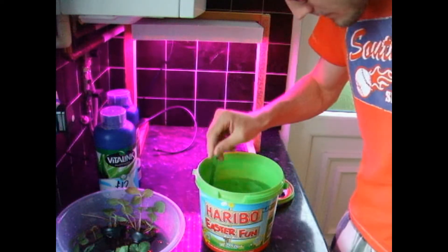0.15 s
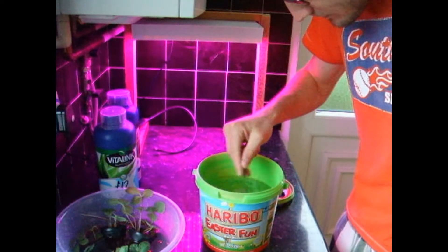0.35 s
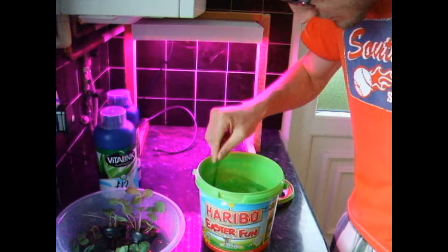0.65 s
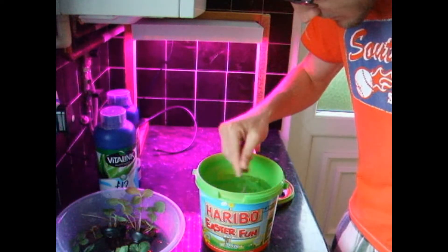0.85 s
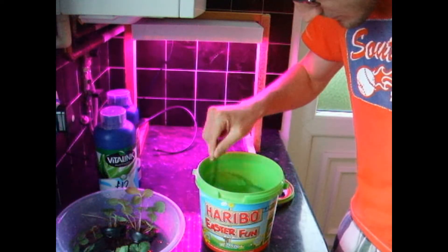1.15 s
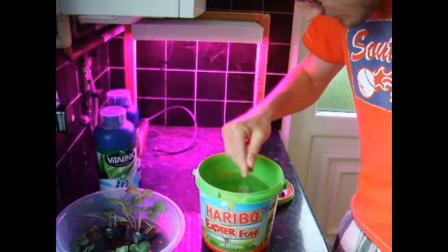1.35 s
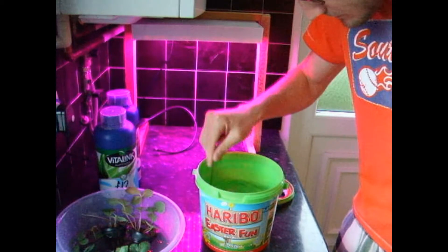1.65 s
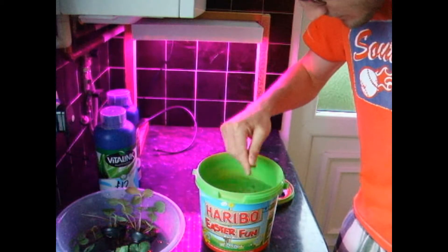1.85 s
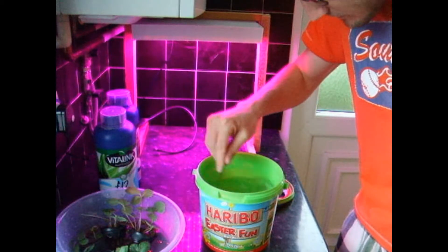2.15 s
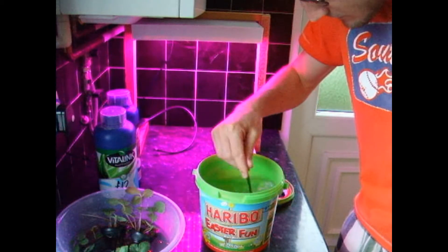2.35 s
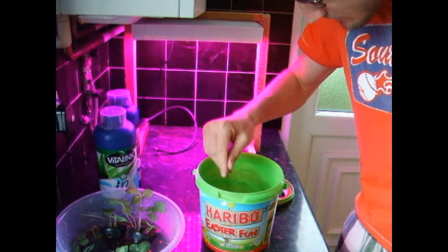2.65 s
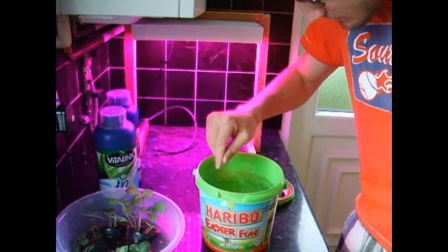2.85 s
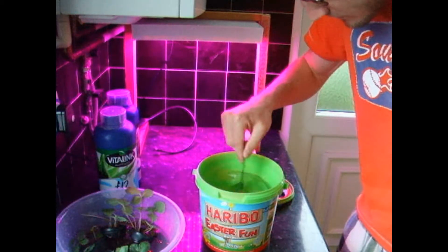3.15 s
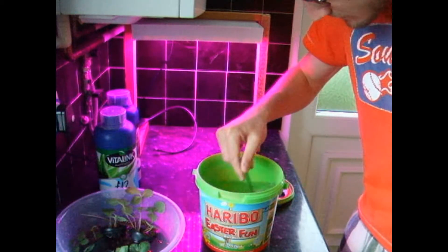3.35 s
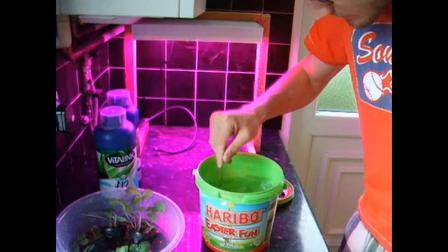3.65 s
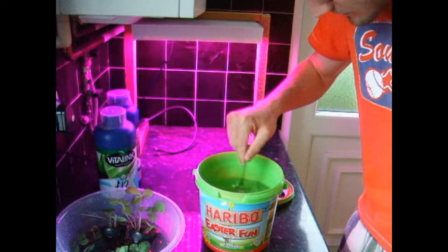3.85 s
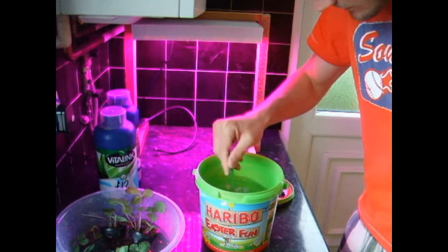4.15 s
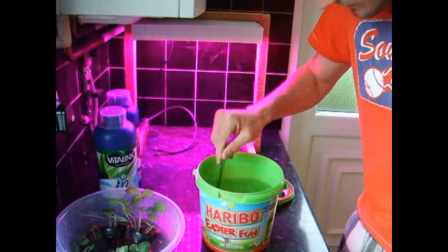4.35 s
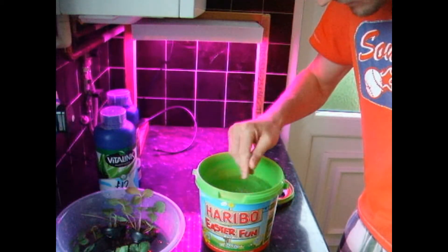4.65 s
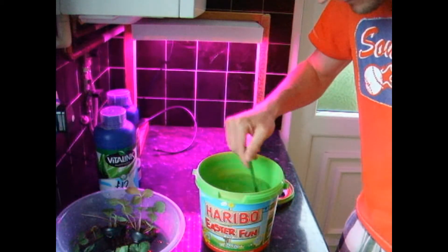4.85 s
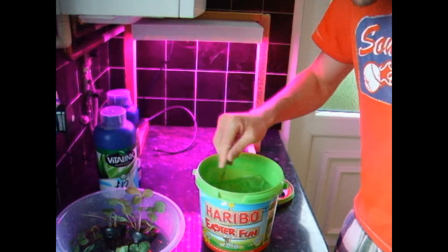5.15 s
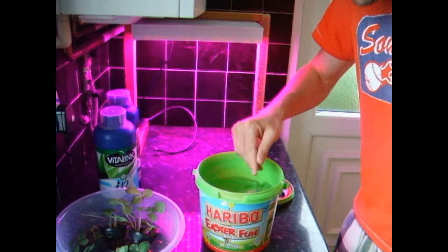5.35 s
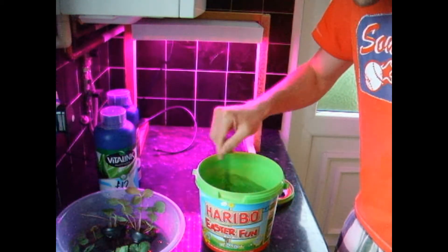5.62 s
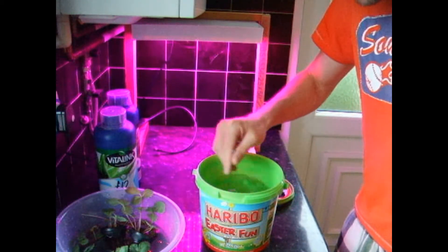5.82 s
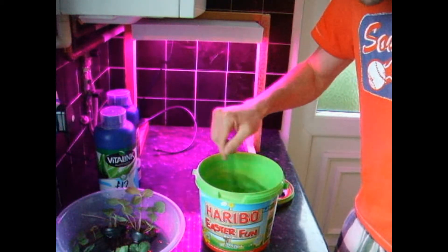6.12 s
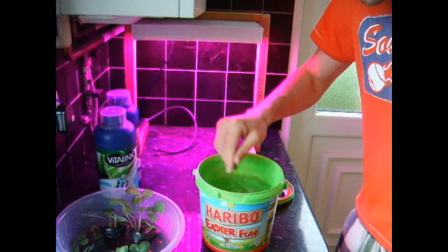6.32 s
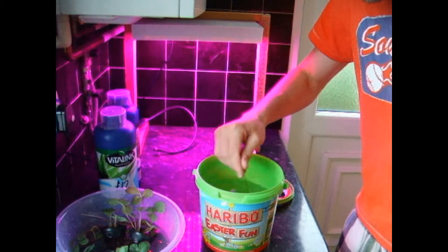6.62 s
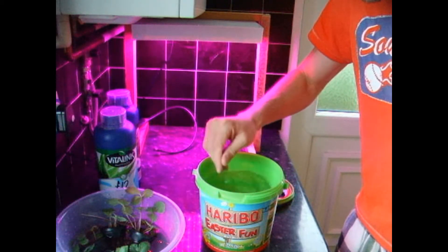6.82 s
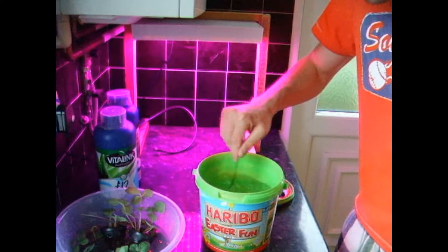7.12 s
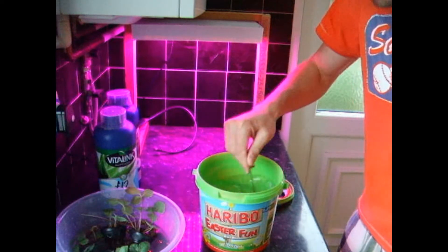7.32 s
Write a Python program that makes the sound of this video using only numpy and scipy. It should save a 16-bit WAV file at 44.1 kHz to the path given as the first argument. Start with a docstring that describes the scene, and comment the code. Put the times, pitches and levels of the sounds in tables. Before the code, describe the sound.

Irregular clicks and hollow knocks on a plastic bucket as water is stirred, with faint swishes and bubbles in a quiet kitchen.

```python
"""Ticks and hollow knocks over lapping water: a thin stick stirs a plastic bucket in a tiled kitchen.
Each contact ticks, rings the water-laden wall and rocks the water to a soft low note.
The wake traps bubbles that plink, swish and fizz; the surface tears in small splashes.
The room rings briefly, over steady room noise, mains hum and a small camera's hiss and whine.
From halfway, a faint low drone climbs twice."""
import sys
import numpy as np
from scipy import signal
from scipy.fft import rfft, irfft, next_fast_len
from scipy.io import wavfile
from scipy.ndimage import map_coordinates

SR = 44100
rng = np.random.default_rng(int(sys.argv[2]) if len(sys.argv) > 2 else 0)


def generate_wav(signal):
    """Clip the signal to [-1, 1] and save it as 16-bit WAV at the path in sys.argv[1]."""
    frames = np.transpose(np.atleast_2d(signal))
    scaled = np.clip(frames, -1, 1) * 32767
    pcm = np.round(scaled).astype(np.int16)
    wavfile.write(sys.argv[1], SR, pcm)


N = 329868
TIME_S = np.arange(N) / SR
AGE_S = np.arange(SR // 2) / SR  # since an event's onset


def amp(db):
    """Decibels to gain."""
    return 10 ** (np.asarray(db) / 20)


def unit_rms(x):
    """Scale to rms 1."""
    return x / np.sqrt(np.mean(x ** 2) + 1e-20)


def along(points, hz):
    """Interpolate (freq_hz, value) points on a log frequency axis."""
    freq_hz, values = np.transpose(points)
    return np.interp(np.log(hz + 1), np.log(freq_hz + 1), values)


def filtered(x, response):
    """Apply the gain response(hz)."""
    size = next_fast_len(len(x) + 8192)
    return irfft(rfft(x, size) * response(np.fft.rfftfreq(size, 1 / SR)), size)[:len(x)]


def noise(spectrum, size):
    """Coloured noise, rms 1."""
    return unit_rms(filtered(rng.standard_normal(size), lambda hz: amp(along(spectrum, hz))))


def wobble(rate_hz):
    """Smooth random curve with knots at rate_hz."""
    return map_coordinates(rng.standard_normal(N // 100), [TIME_S * rate_hz], mode="wrap")


def fade(t60_s, age_s=AGE_S):
    """Decay of 60 dB in t60_s."""
    return np.exp(-np.log(1000) * age_s / np.maximum(t60_s, 1e-3))


def swell(rise_s):
    """Soft onset."""
    return 1 - np.exp(-(AGE_S / max(rise_s, 1e-4)) ** 2)


def arch(middle_s, length_s):
    """Half-cosine rise and fall, zero outside."""
    return np.cos(np.pi * np.clip((TIME_S - middle_s) / length_s, -.5, .5))


def burst(spectrum, envelope):
    """Enveloped noise, scaled to the envelope's energy."""
    x = noise(spectrum, len(AGE_S)) * envelope
    return x * np.linalg.norm(envelope) / np.linalg.norm(x)


def add(track, start_s, sound):
    """Mix a sound into the track."""
    part = track[max(round(start_s * SR), 0):][:len(sound)]
    part += sound[:len(part)]


# room noise: freq_hz, density_db
ROOM_SPECTRUM = [(20, -10), (45, -6.5), (100, -3), (135, -4.5), (170, -7), (300, -6.5), (750, -5),
                 (1450, -10.5), (2100, -16.5), (2800, -12), (4100, -17), (5100, -15.5), (6400, -16.5),
                 (8000, -25)]
# mains hum and one faint high tone: pitch_hz, rms_db
HUM_TONES = [(49, -67), (98, -79), (147, -66.5), (2821, -97.5)]
# camera whine: pitch_hz, level_db
WHINE_TONES = [(7678, -78), (7707, -78), (8312, -84)]
# camera hiss: freq_hz, density_db
HISS_SPECTRUM = [(5500, -40), (6800, -8), (7600, 0), (8600, 0)]


def background(room_db=-54.0, hiss_db=-71, fuzz_db=-3):
    """Steady room noise and firm mains hum; the camera adds hiss and a fuzzy whine."""
    def tone(hz, drift_rad):
        return np.sqrt(2) * np.sin(2 * np.pi * hz * TIME_S + drift_rad)

    hum = sum(amp(db) * tone(hz, 0.43 * wobble(4.9)) for hz, db in HUM_TONES)
    whine = np.zeros(N)
    for hz, db in WHINE_TONES:
        core = tone(hz, .6 * wobble(25.0))
        fuzz = amp(fuzz_db) * wobble(110) * tone(hz, 2 * wobble(60))
        whine += amp(db) * (core + fuzz)
    hiss = amp(hiss_db) * noise(HISS_SPECTRUM, N)
    return amp(room_db) * noise(ROOM_SPECTRUM, N) + hum + whine + hiss


# room decay: freq_hz, t60_s
ROOM_DECAY = [(130, 0.27), (400, 0.31), (1000, 0.22), (2800, 0.35), (8000, 0.11)]
# nearest tiles and cupboards: nominal_delay_s, level_db
WALL_ECHOES = [(.0045, -13), (.0085, -12), (0.0125, -11)]


def kitchen(x, wet_db, build_s):
    """Near walls echo, then the room rings; delays and tail are drawn anew for each sound."""
    hz, frame_s, frames = signal.stft(rng.standard_normal(len(AGE_S)), SR, nperseg=256)
    decay = fade(along(ROOM_DECAY, hz)[:, None], frame_s)
    tail = signal.istft(frames * decay, SR, nperseg=256)[1][:len(AGE_S)]
    reverb = signal.fftconvolve(x, tail * swell(build_s))[:len(x)]
    near = x.copy()
    for delay_s, db in WALL_ECHOES:
        add(near, delay_s * rng.uniform(0.78, 1.15), amp(db) * x)
    return (unit_rms(near) + amp(wet_db) * unit_rms(reverb)) * np.sqrt(np.mean(x ** 2))


def bubble_swarm(spectrum, low_hz, high_hz, t60_cycles, spread_db, count):
    """Tiny bubbles of random onset, pitch and size chirp upward in the room; rms 1."""
    track, age_s = np.zeros(N), AGE_S[:SR // 20]
    for when, place, size in rng.random((count, 3)):
        hz = low_hz * (high_hz / low_hz) ** place
        chirp = np.sin(2 * np.pi * hz * age_s * (1 + 2 * age_s))
        add(track, when * N / SR, amp(spread_db * size ** 2) * chirp * fade(t60_cycles / hz, age_s))
    coloured = filtered(track, lambda hz: amp(along(spectrum, hz)))
    return unit_rms(kitchen(coloured, wet_db=1, build_s=0.024))


# quick strokes of the stick: fastest_s, length_s, swish_db, slosh_db
STICK_STROKES = [(0.424, 0.093, -43.5, -42.5), (0.615, 0.053, -43.5, -51.5), (1.122, 0.052, -47, -57),
                 (1.396, 0.16, -47.5, -46.5), (1.656, .06, -48, -42), (2.104, .06, -53, -42.5),
                 (2.624, 0.13, -49, -57), (3.102, 0.16, -52, -46.5), (3.268, 0.11, -42.5, -42.5),
                 (3.768, .06, -59, -48), (4.318, 0.051, -51, -40), (4.79, 0.076, -43.5, -50),
                 (5.4, .04, -45, -48), (6.237, 0.1, -59, -43), (6.76, 0.084, -48.5, -66),
                 (7.29, 0.31, -49, -47)]
# lapping water: freq_hz, gain_db
SLOSH_SPECTRUM = [(120, -31.5), (300, -11), (550, -3.5), (800, 5), (1450, 6.5), (2000, 0.5), (4000, -48)]
# fizz and spray: freq_hz, gain_db
SPRAY_SPECTRUM = [(900, -48.5), (2000, -7.5), (2800, -2), (3300, 1), (3900, -7), (5100, 1), (6300, -15.5),
                  (9000, -64.5)]


def wake(wave_s=0.2, slosh_gain_db=-4.5, fizz_gain_db=-7, fizz_share=.15):
    """Stirred water laps low and fizzes high; each stroke raises a wave that adds to both."""
    calm_slosh, calm_fizz = amp(-52), amp(-55.5)
    waves = sum(amp(db) * arch(fastest_s, wave_s) for fastest_s, _, _, db in STICK_STROKES)
    slosh = bubble_swarm(SLOSH_SPECTRUM, 286.0, 1870, t60_cycles=25.0, spread_db=15.5, count=2000)
    fizz = bubble_swarm(SPRAY_SPECTRUM, 1500, 6500, t60_cycles=7.5, spread_db=14.5, count=2600)
    return (amp(slosh_gain_db) * np.hypot(calm_slosh, waves) * slosh
            + amp(fizz_gain_db) * np.hypot(calm_fizz, fizz_share * waves) * fizz)


# stick meets bucket: start_s, level_db, thump_relative_db, tick_relative_db
CONTACTS = [(0.049, -38, -29, 2), (0.087, -32, -22, -7.5), (0.48, -26.5, -6, -5.5),
            (0.684, -23.5, -8.5, -4), (0.76, -37.5, 9, -19), (0.968, -23.5, -8, -7.5),
            (1.005, -28.5, -5, -13), (1.168, -23, -28, -1.5), (1.197, -27, -8.5, -8), (1.462, -27, -12, -1),
            (1.523, -34.5, 0.5, -8), (1.659, -24.5, -7.5, -5.5), (1.701, -28, -4, -22),
            (1.919, -17.5, -2, -8.5), (1.929, -10, -15, -23), (1.938, -14, -10, -28),
            (2.147, -27.5, -10, -14), (2.198, -37.5, 0, -26), (2.453, -36.5, -1, -8),
            (2.941, -28.5, -2, -37), (3.415, -18, -6.5, -20), (3.828, -26, -12, -4.5),
            (3.898, -29.5, -15, -6), (3.966, -31.5, -26, -2.5), (4.385, -19.5, -16, -5.5),
            (4.838, -18, -8.5, -7), (4.847, -16.5, -12, -30), (5.156, -23, -19, -6), (5.316, -36, 5, -4),
            (5.435, -19, -8, -5.5), (5.719, -16.5, -13.5, -12.5), (6.039, -21.5, -7, -1.5),
            (6.254, -25.5, -16.5, -6.5), (6.342, -31.5, -12, -9), (6.491, -29, -8, -18),
            (7.378, -26, -2.5, 1)]
# modes of the filled bucket: pitch_hz, level_db, t60_s
BUCKET_MODES = [(294.7, 1, 0.11), (338, -4, 0.11), (468.5, -6.5, 0.37), (512.1, 1.5, 0.17),
                (561, -2.5, 0.11), (688.5, 5, 0.092), (685, 2.5, 0.22), (765.2, 13, 0.077),
                (848, -10, 0.075), (929.5, -1.5, 0.17), (1020, -10, 0.15), (1102, -2, 0.28),
                (1348, -6, 0.19), (1390, -48.5, 0.12), (1633, -5.5, 0.078)]
# wall thud: freq_hz, density_db
THUD_SPECTRUM = [(100, -32.5), (215, -55.5), (285, -4), (390, -5), (510, -4.5), (780, 6), (1000, -4.5),
                 (1200, -4), (1500, -7.5), (1950, -28), (2600, -29), (3300, -34.5), (4000, -44.5),
                 (9000, -80.5)]
# stick tick: freq_hz, density_db
TICK_SPECTRUM = [(300, -22.5), (1000, -21.5), (1500, 10), (2000, -9), (2600, 4), (3300, -5), (3900, -13.5),
                 (5200, -9), (6300, -30), (9000, -53.5)]


def thump_tilt_db(hz, thump_db, offset_db=8, bass_hz=560, treble_hz=1200):
    """A blunt, deep contact moves more of the wall: more bass, less treble."""
    bass_shelf = 1 / (1 + (hz / bass_hz) ** 6)
    treble_shelf = 1 / (1 + (treble_hz / hz) ** 6)
    return (thump_db + offset_db) * (bass_shelf - 0.27 * treble_shelf)


def knocks(ring_db=-21, thud_db=-3.0, rebound_db=1.0, rebound_s=.008, tick_gain_db=-2, scatter_db=3):
    """The stick ticks at once; the water-laden wall swings in, springs back and rings."""
    track = np.zeros(N)
    mode_hz, mode_db, t60_s = np.transpose(BUCKET_MODES)[:, :, None]
    for start_s, level_db, thump_db, tick_db in CONTACTS:
        rise_s = 0.0029 * 2 ** ((level_db + 28.5) / 28)  # a harder push bends the wall for longer
        strength = amp(mode_db + thump_tilt_db(mode_hz, thump_db) + 2 * rng.standard_normal(t60_s.shape))
        modes = np.sin(2 * np.pi * (mode_hz * AGE_S + rng.random(mode_hz.shape)))
        ring = amp(ring_db) * np.sum(strength * fade(t60_s) * modes, axis=0) * swell(rise_s)
        wall_spectrum = [(hz, db + thump_tilt_db(hz, thump_db)) for hz, db in THUD_SPECTRUM]
        thud = burst(wall_spectrum, amp(thud_db) * fade(0.044) * swell(rise_s))
        rebound = burst(wall_spectrum, amp(rebound_db) * fade(0.021) * swell(0.0011))
        body = ring + thud
        add(body, rebound_s, rebound)
        # the tick's colour varies from place to place on the wall
        colour = [(hz, db + scatter_db * rng.standard_normal()) for hz, db in TICK_SPECTRUM]
        tick = burst(colour, amp(tick_db + tick_gain_db) * fade(0.031) * swell(0.00028))
        knock = kitchen(body, wet_db=-4.5, build_s=0.014) + kitchen(tick, wet_db=-4.5, build_s=0.0079)
        add(track, start_s, amp(level_db) * knock)
    return track


def heaves(pitch_hz=130.7, t60_s=0.57, gain_db=-35.5, db_per_thump_db=0.54):
    """Each thump rocks the water mass against the soft wall, giving a low note."""
    track = np.zeros(N)
    for start_s, level_db, thump_db, _ in CONTACTS:
        note = np.sin(2 * np.pi * (pitch_hz * AGE_S + rng.random())) * fade(t60_s) * swell(2 / pitch_hz)
        add(track, start_s, amp(gain_db + db_per_thump_db * (level_db + thump_db)) * note)
    return track


# larger bubbles: start_s, pitch_hz, level_db, glide_octaves_per_s
LARGE_BUBBLES = [(0.278, 2616, -26.5, 3), (0.279, 2887, -29.5, 2), (0.584, 1315, -28, 1),
                 (0.586, 2080, -37.5, 4), (0.605, 1536, -27.5, 2), (0.648, 1463, -10.5, 0.5),
                 (1.109, 2670, -40, 3.5), (1.111, 1700, -36.5, 7), (1.168, 1517, -22, 10),
                 (1.169, 1092, -19.5, -5.5), (1.315, 1097, -27.5, 4), (1.347, 1275, -34.5, 12),
                 (1.70, 356, -34.5, -3), (1.907, 2810, -37, 5), (2.055, 1124, -35, -0.5),
                 (2.225, 473, -43, -1.5), (2.551, 2265, -39, 12), (2.735, 3300, -45, -0.5),
                 (2.84, 290, -46, 0), (2.55, 1590, -42.5, 4.5), (2.582, 1760, -41, 0),
                 (3.165, 822, -33.5, 3), (3.196, 1134, -30.5, 28), (3.207, 1465, -28, 5),
                 (3.679, 2380, -29, 7), (3.679, 2593, -27.5, 1), (3.681, 1690, -35.5, 5.5),
                 (4.199, 1023, -36, 2.5), (4.2, 1275, -36.5, -1), (4.258, 1304, -34, 3),
                 (4.71, 1450, -39, -6), (4.727, 1420, -33, 2.5), (4.762, 1520, -36, 2),
                 (5.064, 1290, -31, 16.5), (5.145, 840, -31, 14.5), (5.155, 1043, -26, 28.5),
                 (5.385, 1550, -31.5, -0.5), (5.396, 2650, -40.5, -1), (5.975, 2650, -40, 3),
                 (6.176, 1126, -41.5, 16.5), (6.490, 670, -28.5, -1), (6.693, 2690, -40, 13),
                 (6.608, 1277, -39.5, 9), (6.733, 1297, -32.5, 3), (6.754, 1450, -31, 2),
                 (6.78, 1428, -34.5, 14.5), (6.779, 2470, -41, 1.5), (7.218, 1870, -35, -3),
                 (7.199, 1350, -34.5, 1), (7.218, 1442, -31.5, -0.5), (7.23, 1403, -27.5, 3),
                 (7.246, 3300, -33.5, 1.5), (7.268, 1431, -19.5, 10), (7.272, 1840, -31, 4.5),
                 (7.273, 2840, -36, -0.5), (7.312, 3000, -38.5, 6)]


def bubbles(gain_db=3, spit_db=-26, quiver_octaves=0.023, glide_s=.04, t60_at_1khz_s=0.078):
    """Each bubble pinches off with a spit and rings; most climb in pitch as they near the surface."""
    track = np.zeros(N)
    for start_s, hz, level_db, glide_octaves_per_s in LARGE_BUBBLES:
        quiver = quiver_octaves * noise([(80, -1), (400, -42)], len(AGE_S))  # the current deforms it
        pitch_hz = hz * 2 ** (glide_octaves_per_s * np.minimum(AGE_S, glide_s) + quiver)
        t60_s = t60_at_1khz_s * (1000 / hz) ** 0.61  # smaller bubbles die sooner
        plink = np.sin(2 * np.pi * np.cumsum(pitch_hz) / SR) * fade(t60_s)
        spit = burst([(hz / 2, -32), (hz, 0), (hz * 2, -20), (hz * 4, -60)], fade(0.037))
        sound = amp(level_db + gain_db) * plink + amp(spit_db + 0.69 * level_db) * spit
        add(track, start_s, kitchen(swell(2.2 / hz) * sound, wet_db=-4.5, build_s=0.0059))
    return track


def swishes(gain_db=-2):
    """A quick stroke folds a cluster of small bubbles into the water."""
    envelope = sum(amp(db + gain_db) * arch(at_s, length_s) for at_s, length_s, db, _ in STICK_STROKES)
    spectrum = [(900, -4.5), (1450, -2.5), (2000, -4.5), (2700, 7), (3600, -6.5)]
    return envelope * bubble_swarm(spectrum, 990, 3860, t60_cycles=22, spread_db=13.5, count=2200)


# small sharp splashes: start_s, level_db, centre_hz
SURFACE_TEARS = [(0.4247, -30.5, 3120), (0.4424, -29, 2840), (1.1612, -29.5, 2930), (1.5946, -37, 4970),
                 (1.632, -36.5, 2820), (2.0543, -37.5, 5750), (2.0716, -42, 4640), (2.0834, -27.5, 2580),
                 (3.233, -31.5, 2870), (3.2624, -33, 4000), (4.049, -37, 4820), (5.636, -32.5, 2780),
                 (7.2686, -34, 3500), (7.3107, -35, 2820)]


def splashes(gain_db=-7, slope_db_per_octave=8):
    """The surface tears behind the stick in short spits, each focused round its own frequency."""
    track = np.zeros(N)
    for start_s, level_db, centre_hz in SURFACE_TEARS:
        colour = [(hz, db - slope_db_per_octave * abs(np.log2(hz / centre_hz)))
                  for hz, db in SPRAY_SPECTRUM]
        spit = burst(colour, fade(0.025) * swell(0.00051))
        add(track, start_s, amp(level_db + gain_db) * kitchen(spit, wet_db=-6.0, build_s=0.0084))
    return track


# climbs of the drone: start_s, length_s, start_hz, level_db
DRONE_CLIMBS = [(3.688, 1.3, 105, -65), (5.005, 1.9, 82, -61.5)]


def drone(top_hz=133, waver_db=2.4):
    """A faint low drone, like an engine beyond the door, swells and fades as its pitch climbs."""
    track = np.zeros(N)
    for start_s, length_s, start_hz, level_db in DRONE_CLIMBS:
        progress = np.clip((TIME_S - start_s) / length_s, 0, 1)
        pitch_hz = start_hz + (top_hz - start_hz) * np.sin(np.pi / 2 * progress)
        envelope = amp(level_db + waver_db * wobble(8)) * arch(start_s + length_s / 2, length_s)
        track += np.sqrt(2) * envelope * np.sin(2 * np.pi * np.cumsum(pitch_hz) / SR + .5 * wobble(25))
    return track


def scene():
    """All sources, summed to mono."""
    return (background() + drone() + knocks() + heaves() + bubbles() + splashes() + swishes() + wake())[None]


def record(dry):
    """The camera's band limit: a steep low-pass."""
    cutoff_hz = 8520
    return np.array([filtered(x, lambda hz: 1 / np.sqrt(1 + (hz / cutoff_hz) ** 150)) for x in dry])


dry = scene()
out = record(dry)
generate_wav(out)
```